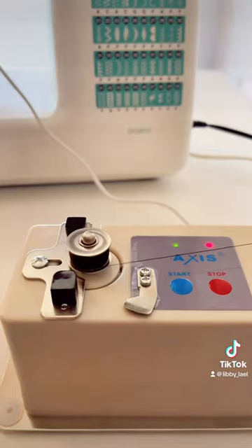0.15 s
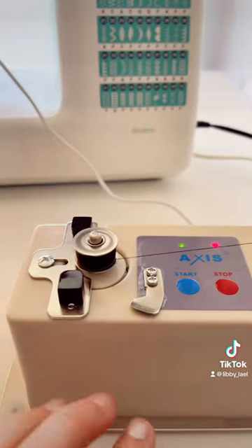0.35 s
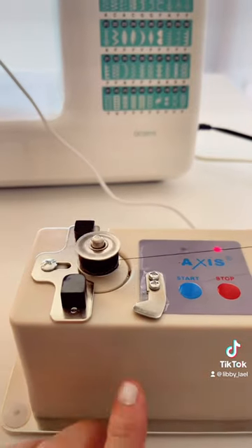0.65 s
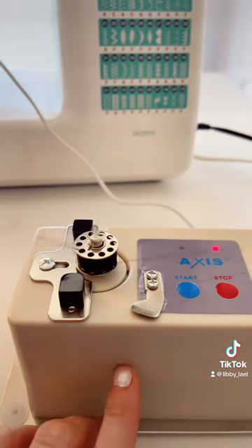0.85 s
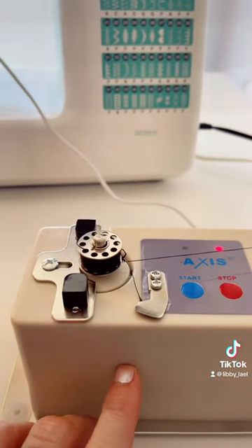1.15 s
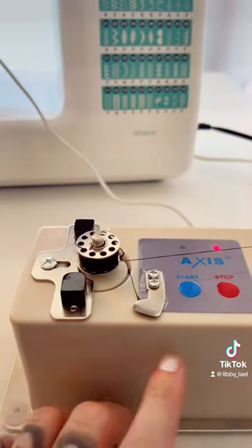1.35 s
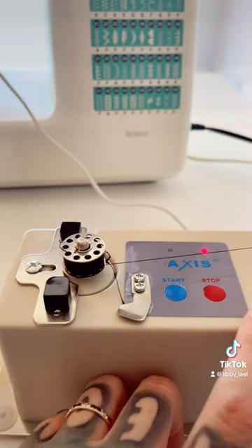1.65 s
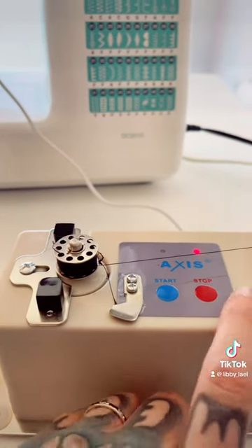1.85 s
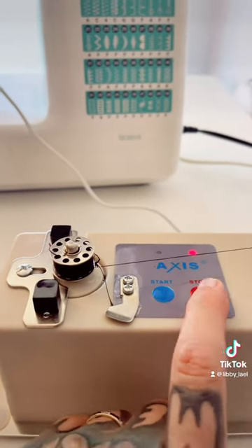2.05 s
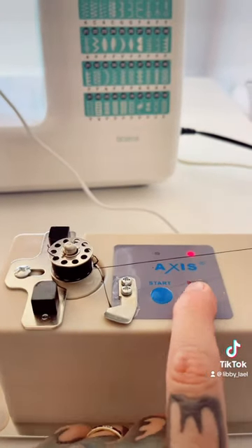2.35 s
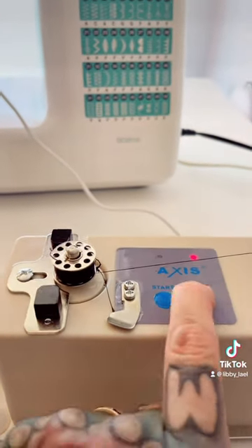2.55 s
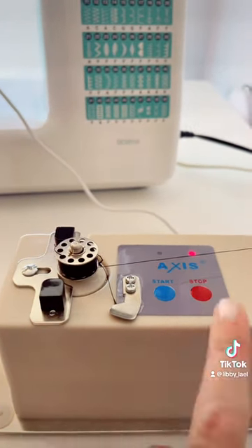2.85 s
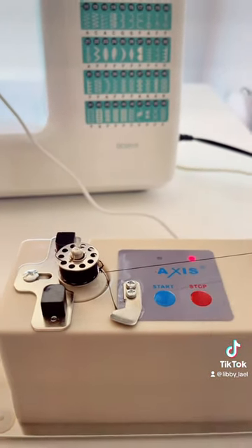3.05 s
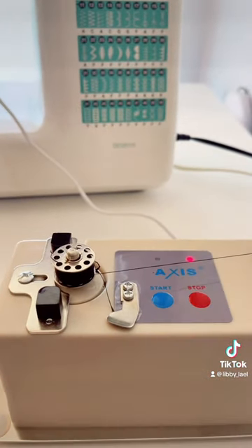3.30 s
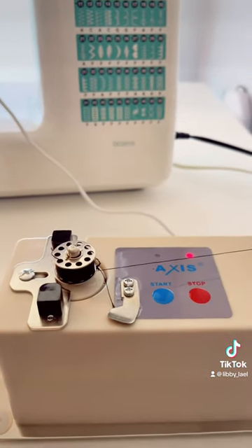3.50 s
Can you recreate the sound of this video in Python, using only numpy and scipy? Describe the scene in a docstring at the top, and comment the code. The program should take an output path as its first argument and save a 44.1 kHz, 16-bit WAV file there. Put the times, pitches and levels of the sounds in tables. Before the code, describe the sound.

A small electric bobbin winder whirs close by, with light metal rattles and a thin thread whistle, then falls in pitch and stops by about 0.9 seconds. From 1.3 seconds a hand softly taps and brushes the plastic case. A button clicks down at 2.5 seconds and up at 2.7, with dull bumps and faint rubbing afterwards. A low electrical hum and rumble fill the small room throughout.

```python
"""First you hear a small bobbin winder whirring on a table: its gears hum, its steel bobbin
rattles and whines, and its thread hisses. Within a second it coasts to a halt.
Then a hand slides over the plastic case and presses the stop button, which clicks down and
up again as its springy dome snaps. Mains hum and a low rumble fill the small room throughout."""
import sys
import numpy as np
from scipy import signal
from scipy.fft import rfft, irfft, next_fast_len
from scipy.io import wavfile
from scipy.ndimage import uniform_filter1d, map_coordinates

SR = 44100
rng = np.random.default_rng(int(sys.argv[2]) if len(sys.argv) > 2 else 0)


def generate_wav(signal):
    """Clip the signal to [-1, 1] and save it as 16-bit WAV at the path in sys.argv[1]."""
    frames = np.transpose(np.atleast_2d(signal))
    scaled = np.clip(frames, -1, 1) * 32767
    pcm = np.round(scaled).astype(np.int16)
    wavfile.write(sys.argv[1], SR, pcm)


N = 161847


# how fast the shaft turns: t/s, f/Hz
SHAFT_SPEED = [(0, 96.7), (.35, 96.9), (.62, 97.9), (.68, 88), (.76, 58), (.81, 27), (.87, 2)]
# shaft and gear tones at top speed: cycles per turn, level/dB
GEAR_TONES = [(3, -57), (8, -61), (9, -57), (12, -54)]
# where the winder's frame rings: f/Hz, width/Hz, relative level/dB
FRAME_RINGS = [(249, 23, -4), (290.6, 22.4, -0.5), (350.3, 14, 3), (510, 37, -4.5), (558.5, 14.6, 3),
               (628, 23, -3), (795, 77, -2.5), (886, 38, 0), (927, 39, -3), (1255.5, 10, 4.5),
               (1480, 104, -4), (1650, 28, -4)]
# tone colour of the whir: f/Hz, relative level/dB
WHIR_COLOUR = [(400, -18), (847, 2), (1080, -8), (1470, -17), (1830, -14), (1990, -8.5), (2600, -16.5),
               (3300, -15), (6190, -17), (8930, -40), (15500, -38)]

def motor(frame_db=-42.5, steel_db=-49, whir_db=-46.5, steel_fade_db_per_s=5):
    """Gears hum while tiny knocks shake the frame and bobbin; all fade as the shaft slows."""
    hz, = curves(SHAFT_SPEED)
    speed = hz / hz.max()
    angle = 2 * np.pi * np.cumsum(hz) / SR
    gears = np.zeros(N)
    for per_turn, db in GEAR_TONES:
        gain = amp(db + 2 * wobble(18)) * np.sqrt(2)
        gears += gain * np.sin(round(per_turn) * angle + 0.53 * wobble(33.56))
    frame = amp(frame_db) * resonate(chatter(friction=0.44), FRAME_RINGS)
    frame *= 1 + 0.12 * np.sin(angle)  # swells once a turn
    steel = amp(steel_db - steel_fade_db_per_s * np.arange(N) / SR) * steel_scrape()
    whir = amp(whir_db) * noise(WHIR_COLOUR)
    hiss = (steel + whir) * amp(wobble(60.6))  # flutters by about 1 dB
    # the higher the power of speed, the sooner that part fades
    return frame * speed ** 1.85 + hiss * speed ** 2.4 + gears * speed ** 8


def chatter(friction, hits_per_s=980):
    """Many tiny knocks of uneven size, on top of a steady rubbing noise."""
    hits = (rng.random(N) < hits_per_s / SR) * rng.standard_normal(N)
    return unit(hits) + friction * rng.standard_normal(N)


# where the steel bobbin and thread guide ring: f/Hz, width/Hz, relative level/dB
STEEL_RINGS = [(3544, 200, -1), (4120, 300, -1.5), (5500, 420, -9), (7520, 1200, -6), (8010, 560, -2),
               (8430, 320, -5.5), (8950, 320, -1), (9900, 330, -2.5)]

def steel_scrape(swell_db=1.5):
    """The thread scrapes the steel, which rings in bands that each swell on their own."""
    scrape = chatter(friction=4.0)
    bands = np.zeros(N)
    for hz, width, db in STEEL_RINGS:
        band = unit(filtered(scrape, lambda f: resonance(f, hz, width) ** 2))  # squared: steeper sides
        bands += amp(db + swell_db * wobble(22)) * np.sqrt(width) * band
    return unit(bands)


# the bobbin's high notes at top speed: f/Hz, width/Hz, level/dB
WHINE_NOTES = [(4690, 95, -55.5), (5070, 100, -57), (5330, 130, -58.5)]

def bobbin_whine(wander_hz=24.1):
    """The spinning bobbin sings a few wavering notes that fade as it slows."""
    shaft_hz, = curves(SHAFT_SPEED)
    notes = sum(amp(db) * whistle(hz + wander_hz * wobble(16), width) for hz, width, db in WHINE_NOTES)
    return notes * (shaft_hz / shaft_hz.max()) ** 6.6


# pitch and loudness of the thread's whistle: t/s, f/Hz, level/dB
THREAD_GLIDE = [(0, 4090, -54), (.07, 4080, -54), (.13, 3890, -55), (.42, 3820, -63), (.48, 3780, -52.5),
                (.55, 3490, -51.5), (.625, 3690, -52.5), (.655, 3470, -52), (.685, 3000, -58),
                (.72, 1720, -59), (.736, 1620, -47.5), (.758, 1450, -45), (.81, 1250, -76)]

def thread_whistle():
    """The running thread whistles thinly, sinking to a chirp as the bobbin stops."""
    hz, db = curves(THREAD_GLIDE)
    return amp(db) * whistle(hz, width_hz=260)


# when the bobbin rattles: t/s, level/dB
RATTLE_HITS = [(0.0375, -31.5), (0.0387, -32.5), (.046, -39), (0.083, -35), (0.143, -32.5), (0.479, -36.5)]
# tone colour of a rattle: f/Hz, relative level/dB
RATTLE_COLOUR = [(350, -48), (600, 2), (1600, 1.5), (2870, -14.5), (3470, 2), (5660, -8.5), (7430, -3.5),
                 (10700, -22), (15500, -18)]

def bobbin_rattles(t60_s=0.04):
    """The loose bobbin clatters on its spindle. A t60 is the time a sound takes to fade by 60 dB."""
    loudness = np.zeros(N)
    t = np.arange(SR // 4) / SR
    for start, db in RATTLE_HITS:
        add(loudness, start, amp(db) * fade(t, t60_s))
    return loudness * noise(RATTLE_COLOUR)


# finger touches: t/s, case level/dB, dome level/dB, crack level/dB, case treble cut-off f/Hz
TOUCHES = [(1.273, -39.5, -75, -62, 1500), (1.438, -33, -54, -45, 1900), (2.414, -24, -81, -56, 1060),
           (2.5206, -24, -19, -32, 6000), (2.601, -25, -65, -53, 1100), (2.7444, -18.5, -35, -30, 4700),
           (2.829, -40, -69, -47.5, 3000)]
# notes of the plastic case: f/Hz, relative level/dB, t60/s
CASE_NOTES = [(270, -15, 0.067), (500, -24.5, 0.11), (670, -15, 0.085), (817, -2, 0.025), (921, -14, 0.11),
              (1238, -5, 0.029), (1560, -17.5, 0.022), (1844, -27, 0.11), (2390, -20, 0.053)]
# notes of the button's springy dome: f/Hz, width in the echo/Hz, relative level/dB
DOME_NOTES = [(3400, 260, -12.5), (4220, 404, -10.5), (4700, 400, -8), (5080, 570, 0.5), (5480, 770, -7),
              (5940, 400, -10), (7750, 1500, -17), (9550, 940, -15.5)]
# tone colour of the sharp crack of a touch: f/Hz, relative level/dB
CRACK_COLOUR = [(200, -12.5), (900, 14), (2800, 3.5), (6000, -2.5), (10500, -6.5), (12500, -19.5),
                (15500, -6)]

def finger_taps(dome_t60_s=0.016, dome_rise_s=0.00039, crack_t60_s=0.027, snap_echo_db=-8):
    """Each touch rings the case, the button's dome adds a snap, and the room echoes both."""
    knocks, clicks, snap_gain, crack_gain = np.zeros((4, N))
    t = np.arange(SR // 2) / SR
    for start, case_db, dome_db, crack_db, cutoff_hz in TOUCHES:
        # a softer touch has a lower cut-off: it sounds duller and starts more slowly
        case = sum((-1) ** k * amp(db) * ring(t, hz, t60, blur=0.014) / np.hypot(1, (hz / cutoff_hz) ** 2)
                   for k, (hz, db, t60) in enumerate(CASE_NOTES))
        case *= 1 - np.exp(-t * cutoff_hz / 3)
        dome = sum(amp(db) * ring(t, hz, dome_t60_s, blur=0.007) for hz, _, db in DOME_NOTES)
        dome *= 1 - np.exp(-t / dome_rise_s)
        add(knocks, start, amp(case_db) * case)
        add(clicks, start, amp(dome_db) * dome)
        add(snap_gain, start, amp(dome_db + snap_echo_db) * fade(t, dome_t60_s))
        add(crack_gain, start, amp(crack_db) * fade(t, crack_t60_s))
    echoes = np.zeros(N)
    for _ in range(4):  # each wall gets a different snap and sends it back smeared
        snaps = snap_gain * resonate(rng.standard_normal(N), DOME_NOTES)
        echoes += room(snaps + crack_gain * noise(CRACK_COLOUR)) / 2
    return knocks + room(knocks) + clicks + crack_gain * noise(CRACK_COLOUR) + echoes


# bumps of the case on the table: t/s, level/dB, f/Hz
BUMPS = [(2.427, -41, 85), (2.525, -35, 277), (2.737, -32.5, 85), (2.827, -38.5, 237), (2.859, -35.5, 82)]

def case_bumps(cycles_to_peak=0.95):
    """The case thuds dully against the table as the finger pushes and lets go."""
    track = np.zeros(N)
    t = np.arange(SR // 4) / SR
    for start, db, hz in BUMPS:
        age = t * hz / cycles_to_peak
        swell = age * np.exp(1 - age)
        add(track, start, amp(db) * swell * np.sin(2 * np.pi * hz * t))
    return track


# loudness of the sliding hand: t/s, level/dB
SLIDE_LEVEL = [(1.24, -100), (1.275, -59), (1.36, -65.5), (1.56, -60), (1.72, -68), (1.84, -57),
               (1.91, -72), (2.1, -85), (2.68, -66), (2.835, -53), (2.92, -65.5), (3.04, -64),
               (3.062, -52.5), (3.085, -57), (3.115, -56.5), (3.2, -63.5), (3.28, -63.5), (3.36, -78)]
# tone colour of rubbing skin: f/Hz, relative level/dB
SKIN_COLOUR = [(300, 18), (900, 8), (3000, 6), (5000, -0.5), (9000, -2), (12000, -14), (15500, -7.5)]

def hand_slide(rough_db=2):
    """Skin rubs softly and unevenly over the case and table."""
    db, = curves(SLIDE_LEVEL)
    return amp(db + rough_db * wobble(130)) * noise(SKIN_COLOUR)


# mains hum and two fainter steady tones: f/Hz, level/dB
HUM_TONES = [(119.8, -42.5), (239.6, -59), (258, -61.5), (1556, -72)]
# tone colour of the room's rumble: f/Hz, relative level/dB
RUMBLE_COLOUR = [(24, -53), (32, -15), (42, 5.5), (58, -3.5), (170, -8), (260, -14.5), (400, -19.5),
                 (700, -29), (1200, -33.5), (2200, -38), (4000, -45.5), (5200, -52), (10000, -59.5)]

def background(rumble_db=-46, fan_db=-67.5, fan_hz=1633, fan_width_hz=96):
    """Mains hum, a low rumble and a faint, narrow hiss like a fan's."""
    t = np.arange(N) / SR
    hum = np.zeros(N)
    for hz, db in HUM_TONES:
        phase = 2 * np.pi * (hz * t + rng.random()) + 0.037 * wobble(30)
        hum += amp(db) * np.sqrt(2) * np.sin(phase)
    fan = unit(filtered(rng.standard_normal(N), lambda f: 1 / (1 + ((f - fan_hz) / fan_width_hz) ** 2)))
    return hum + amp(rumble_db) * noise(RUMBLE_COLOUR) + amp(fan_db) * fan


# how long the room's echo lasts: f/Hz, t60/s
ECHO_TIMES = [(150, 1), (800, .65), (5000, 0.61), (9000, 0.48), (15000, 0.24)]

def room(x, early_db=-8, early_t60_s=0.062, tail_db=-10):
    """The echo of x: near surfaces answer quickly, then comes a tail whose highs die first."""
    hz, t, bands = signal.stft(rng.standard_normal(SR // 2), SR, nperseg=256)
    _, tail = signal.istft(bands * fade(t, along(ECHO_TIMES, hz)[:, None]), SR, nperseg=256)
    early = rng.standard_normal(len(tail)) * fade(np.arange(len(tail)) / SR, early_t60_s)
    echo = amp(tail_db) * tail / np.linalg.norm(tail) + amp(early_db) * early / np.linalg.norm(early)
    delayed = np.pad(x, (SR // 200, 0))  # 5 ms late
    return signal.fftconvolve(delayed, echo)[:N]


def amp(db):
    """Turn decibels into a number to multiply by."""
    return 10 ** (np.asarray(db) / 20)


def fade(t, t60):
    """A fade that drops 60 dB every t60 seconds."""
    return amp(-60 * t / t60)


def unit(x):
    """Scale x to an average strength (rms) of 1."""
    return x / np.sqrt(np.mean(x ** 2) + 1e-20)


def along(points, hz):
    """Read between (frequency, value) points on a scale of pitch."""
    f, values = np.transpose(points)
    return np.interp(np.log(hz + 1), np.log(f + 1), values)


def curves(rows):
    """Join timed rows with straight lines: one curve for each column after the time."""
    times, *columns = np.transpose(rows)
    return [np.interp(np.arange(N) / SR, times, column) for column in columns]


def wobble(rate):
    """A smooth curve through `rate` random values a second."""
    return map_coordinates(rng.standard_normal(N // 20), [np.arange(N) * rate / SR], mode="wrap")


def filtered(x, response):
    """Multiply each frequency f in x by response(f)."""
    size = next_fast_len(N + SR // 2)
    return irfft(rfft(x, size) * response(np.fft.rfftfreq(size, 1 / SR)), size)[:N]


def noise(colour):
    """Noise of strength 1 with the given tone colour."""
    return unit(filtered(rng.standard_normal(N), lambda hz: amp(along(colour, hz))))


def resonance(f, hz, width):
    """How something that rings at hz responds to being shaken at f."""
    return 1j * f * width / (hz * hz - f * f + 1j * f * width)


def resonate(x, peaks):
    """Let x shake several resonances of alternating sign; the result has strength 1."""
    return unit(filtered(x, lambda f: sum((-1) ** k * amp(db) * resonance(f, hz, width)
                                          for k, (hz, width, db) in enumerate(peaks))))


def ring(t, hz, t60, blur):
    """A struck note that dies away, its pitch smeared over the fraction `blur` of hz."""
    drift = np.cumsum(rng.standard_normal(len(t))) * np.sqrt(2 * np.pi * blur * hz / SR)
    return fade(t, t60) * np.sin(2 * np.pi * hz * t + uniform_filter1d(drift, size=60))


def whistle(hz, width_hz, pure=0.22):
    """A breathy tone of strength 1 that follows the pitch curve hz."""
    phase = 2 * np.pi * np.cumsum(hz) / SR
    return unit((pure + wobble(width_hz)) * np.sin(phase) + wobble(width_hz) * np.cos(phase))


def add(track, start, sound):
    """Mix a sound into the track at `start` seconds."""
    part = track[round(start * SR):][:len(sound)]
    part += sound[:len(part)]


def scene():
    """The winder, the hand and the room, mixed into one channel."""
    winder = motor() + bobbin_whine() + thread_whistle() + bobbin_rattles()
    return (winder + room(winder) + finger_taps() + case_bumps() + hand_slide() + background())[None]


def record(dry):
    """Cut away the very highest treble, above 15900 Hz."""
    return filtered(dry[0], lambda hz: 1 / (1 + (hz / 15900) ** 160))[None]


dry = scene()
out = record(dry)
generate_wav(out)
```